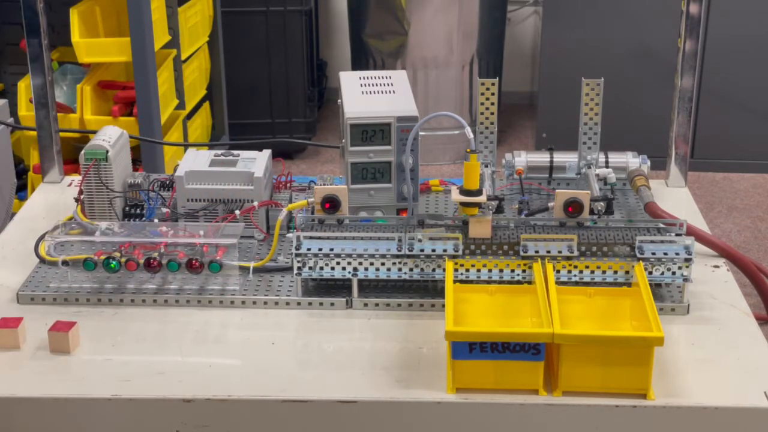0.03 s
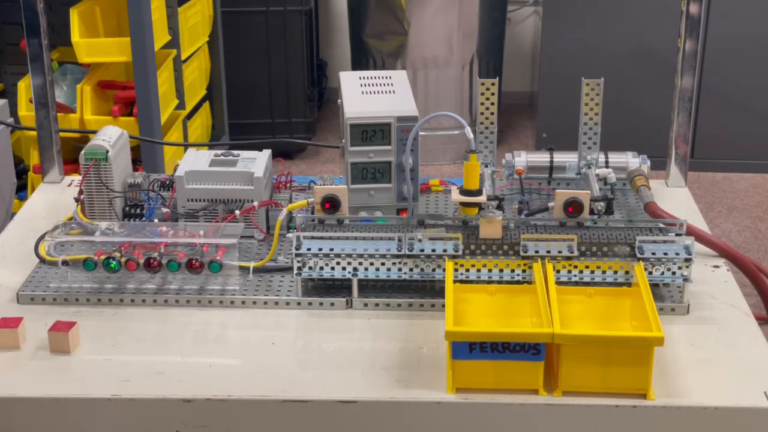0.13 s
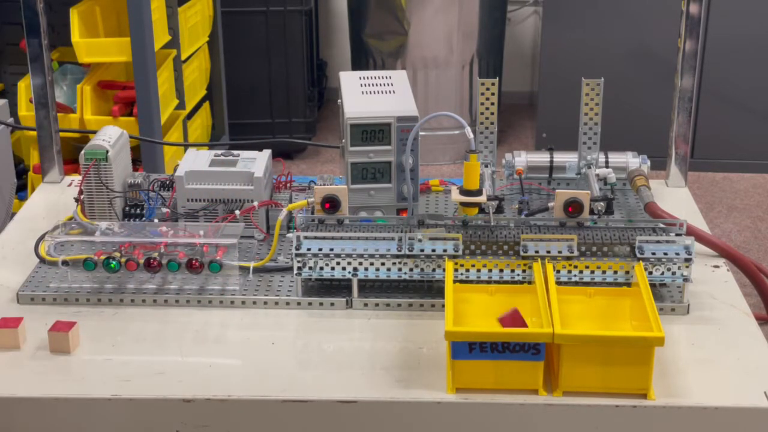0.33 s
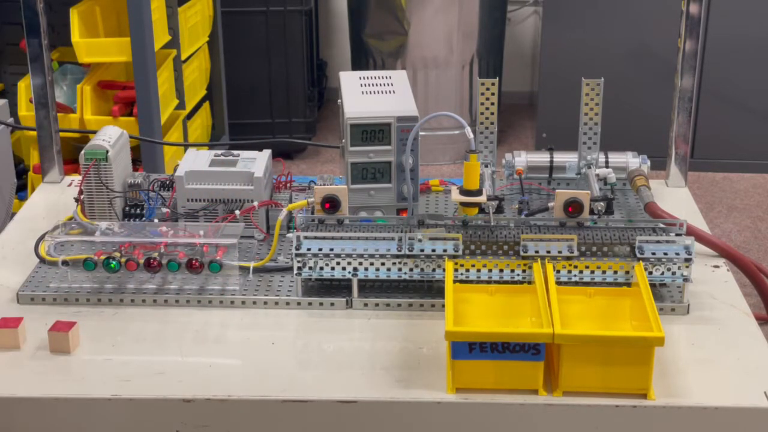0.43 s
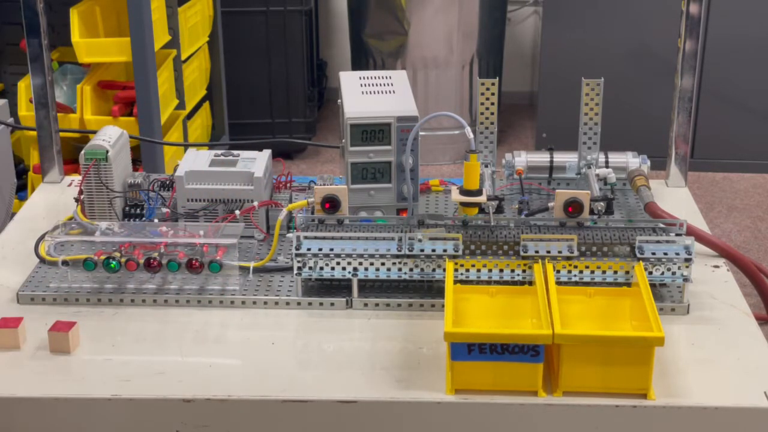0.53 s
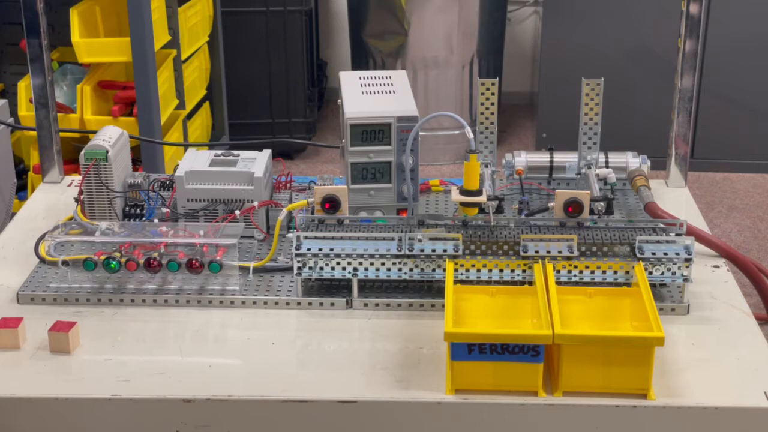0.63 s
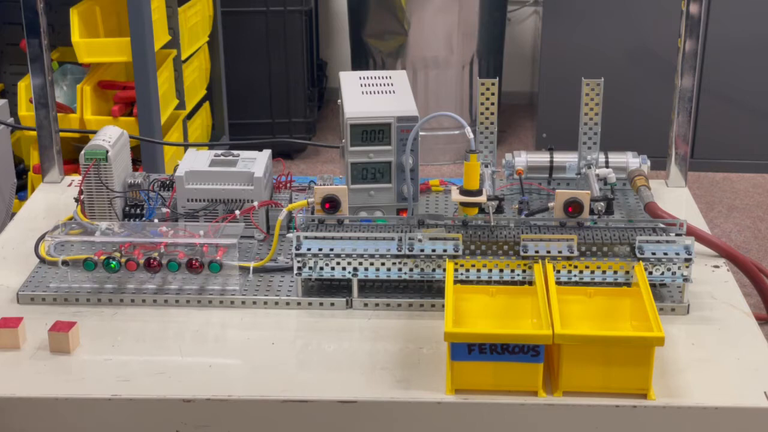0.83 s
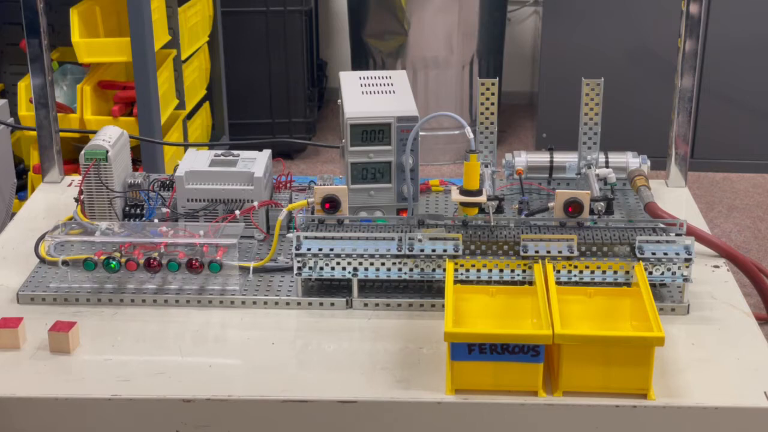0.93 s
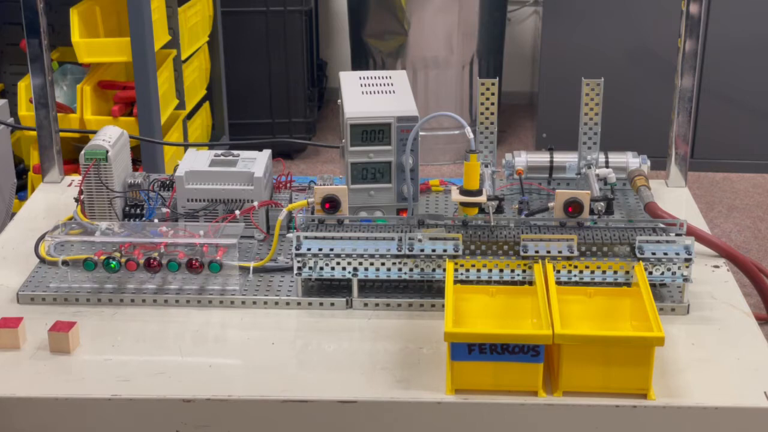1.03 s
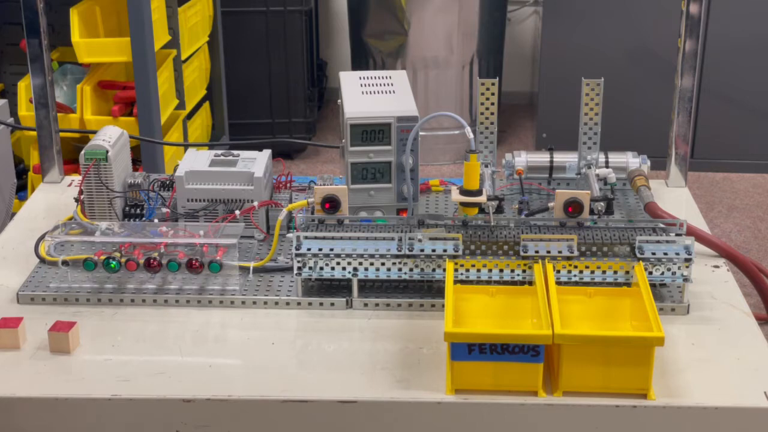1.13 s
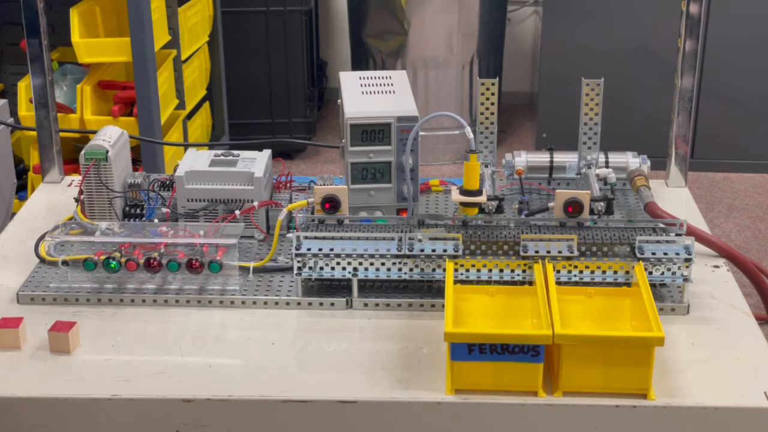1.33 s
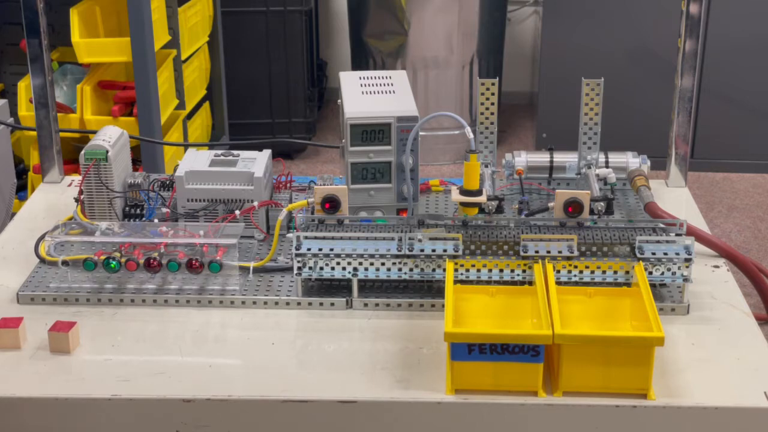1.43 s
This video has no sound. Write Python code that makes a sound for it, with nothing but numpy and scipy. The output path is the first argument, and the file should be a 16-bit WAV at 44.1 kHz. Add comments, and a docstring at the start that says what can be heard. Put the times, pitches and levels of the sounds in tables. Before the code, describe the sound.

A small pneumatic machine pops, hisses and clacks as a block clatters into a plastic bin.

```python
"""A small pneumatic sorter on a table in a hard-walled room, straight ahead of a stereo microphone.
Air hisses until a valve pops; the actuator knocks and the released block clatters into a plastic bin.
A second after the first pop the actuator moves back: a clack, another pop, a fading exhaust and a
knock at the end stop. Ventilation rumbles underneath throughout."""
import sys
import numpy as np
from scipy import signal
from scipy.fft import rfft, irfft
from scipy.io import wavfile

SR = 44100
rng = np.random.default_rng(int(sys.argv[2]) if len(sys.argv) > 2 else 0)


def file_out(sig):
    """Save sig as 16-bit WAV at sys.argv[1]."""
    # one column per channel
    cols = np.atleast_2d(sig).T
    # limit, then scale
    lim = np.clip(cols, -1, 1)
    pcm = np.round(lim * 32767).astype(np.int16)
    wavfile.write(sys.argv[1], SR, pcm)


N = 66150

# landings of the block: start_s, knock_db, edge_db, wall_db, boom_db, hollow_db, contact_cutoff_hz
BLOWS = [(.3618, -5.5, -15, -27, -60, -64, 10960), (0.3749, -22.5, -17.5, -26, -32, -23, 6000),
         (.3795, -30.5, -42, -18.5, -23, -36, 3000), (0.4576, -22.5, -37.5, -23, -31, -43, 4000),
         (0.4673, -17.5, -21, -23, -38, -40, 8000), (0.4949, -21.5, -32.5, -21, -41.5, -18.5, 3500),
         (.547, -25, -29, -59, -73, -55, 9000), (.5512, -23.5, -16, -29, -48.5, -42, 12000),
         (0.615, -52.5, -75, -34, -36.5, -52, 2000), (.756, -35.5, -81, -37.5, -49, -39.5, 1700)]


def block():
    """The block tumbles into the bin: its body knocks and its corners click."""
    # modes of the block knocking on the bin: pitch_hz, level_db, t60_s
    knock_modes = [(1106, -6, 0.014), (1245, -3.5, 0.025), (2626, -3.5, 0.0098), (3497, -1.5, 0.01),
                   (4327, -11, 0.017), (5080, -17.5, 0.008), (6404, -13.5, 0.0079)]
    # spectrum of a corner's click: frequency_hz, gain_db
    edge_spectrum = [(500, -7.5), (2000, 3), (3500, 3.5), (6500, -2), (8000, -7), (10000, -12.5),
                     (12200, -9.5), (15000, -19.5)]
    edges = sum(burst(start, db, t60=0.018) for start, _, db, *_ in BLOWS)
    knocks = sum(soften(ring(start, db, knock_modes), cutoff) for start, db, *_, cutoff in BLOWS)
    return knocks + colour(edges, edge_spectrum)


def plastic_bin():
    """Each landing shakes the walls of the bin; flat ones also make it boom and knock hollowly."""
    # low modes of the bin: pitch_hz, level_db, t60_s
    boom_modes = [(232.9, -10.5, .4), (274.2, -6, 0.34), (353.6, -1, 0.44), (465, -3, 0.19),
                  (512, -5.5, 0.2), (554.4, -3.5, 0.25), (622, -10.5, .3), (910, -15, 0.13),
                  (1003, -27.5, 0.067), (1105, -6.5, .18), (1253, -15.5, .16), (1650, -9.5, .2)]
    # hollow modes of its floor: pitch_hz, level_db, t60_s
    floor_modes = [(610.6, -1, 0.067), (708, -13.5, 0.066), (895, -1.5, 0.027), (1566, -3, 0.04)]
    # spectrum of the dense modes of its walls: frequency_hz, gain_db
    wall_spectrum = [(120, -17), (300, 0.5), (550, 0), (800, 3), (1100, -1), (1600, -3.5), (2100, -3),
                     (3000, -10), (4500, -17), (7500, -30), (15000, -43.5)]
    body = sum(ring(start, boom_db, boom_modes) + ring(start, hollow_db, floor_modes)
               for start, *_, boom_db, hollow_db, _ in BLOWS)
    walls = sum(soften(burst(start, db, t60=0.064), cutoff) for start, _, _, db, *_, cutoff in BLOWS)
    return body + colour(walls, wall_spectrum)


def valve():
    """Each pop is a pressure thump, a crack, a ping and a spit of air; an open line leaks and hisses."""
    # valve pops: start_s, thump_db, thump_pitch_hz, crack_db, crack_t60_s, spit_db
    pops = [(0.2001, -16, 500, -21, 0.025, -46.5), (1.2055, -10, 383, -16, .016, -31.5)]
    # air leaking through the valve: time_s, level_db
    leak_levels = [(0, -44), (.195, -44), (.225, -44.5), (.35, -54.5), (.42, -86), (1.195, -90),
                   (1.215, -46.5), (1.27, -46), (1.36, -55.5), (1.42, -65.5)]
    # spectrum of escaping air: frequency_hz, gain_db
    air_spectrum = [(150, -30.5), (400, -8.5), (1300, -3.5), (2500, -6.5), (5000, -8.5), (7500, -8),
                    (10000, -4), (12500, -12), (15000, -19)]
    # spectrum of the crack: frequency_hz, gain_db
    crack_spectrum = [(150, -12), (500, 8), (1400, 3.5), (1850, 2.5), (3000, 1.5), (4400, -6), (5200, -2.5),
                      (6300, -22.5), (7400, 4.5), (10000, -1.5), (12500, -5), (15000, -13)]
    # modes of the metal valve body: pitch_hz, level_re_crack_db, t60_s
    ping_modes = [(1520, -9, 0.04), (3280, -10.5, 0.017), (5300, -8, 0.013), (7435, -4.5, 0.013),
                  (11600, -7, 0.012), (12640, -8.5, .012)]
    t = np.arange(N) / SR
    thump = sum(-undb(db) * fade(start, t60=0.011) * np.sin(2 * np.pi * hz * (t - start))
                for start, db, hz, *_ in pops)
    thump = signal.sosfilt(signal.butter(2, 188, "high", fs=SR, output="sos"), thump)
    crack = sum(burst(start, db, t60) for start, _, _, db, t60, _ in pops)
    spit = sum(burst(start, db, t60=0.23) for start, *_, db in pops)
    leak_db = np.interp(t, *np.array(leak_levels).T)
    leak = undb(leak_db) * rng.standard_normal(N)
    ping = sum(ring(start, db, ping_modes) for start, _, _, db, _, _ in pops)
    return thump + ping + colour(crack, crack_spectrum) + colour(spit + leak, air_spectrum)


def actuator():
    """The piston knocks at the ends of its stroke and shakes the metal frame."""
    # knocks of the piston: start_s, frame_db, rattle_db, rattle_t60_s, tick_db
    stops = [(.313, -37, -41.5, 0.26, -31.5), (0.375, -61, -44, .1, -26.5), (1.173, -42, -28, 0.14, -64.5),
             (1.3745, -32, -35.5, 0.14, -43.5)]
    # modes of the frame: pitch_hz, level_db, t60_s
    frame_modes = [(349, -6.5, 0.36), (561, -8.5, 0.087), (924, -0.5, 0.037), (996, -1, 0.092),
                   (1220, -2, 0.071), (2148, -7, 0.045), (2470, -10, 0.051), (2600, -17, 0.049),
                   (3079, -15, 0.03), (4600, -8, 0.048)]
    # spectrum of the rattle: frequency_hz, gain_db
    rattle_spectrum = [(150, -33.5), (500, 6.5), (1200, 5.5), (2000, -3.5), (3000, -1), (5000, -11.5),
                       (7500, -15.5), (12000, -24), (15000, -29.5)]
    # spectrum of the treble tick: frequency_hz, gain_db
    tick_spectrum = [(1000, -16), (4000, -34), (7000, 3), (10000, 4), (12000, 6.5), (15000, -10)]
    frame = sum(ring(start, db, frame_modes) for start, db, *_ in stops)
    rattle = sum(burst(start, db, t60, attack_s=0.0016) for start, _, db, t60, _ in stops)
    tick = sum(burst(start, db, t60=0.06) for start, *_, db in stops)
    return frame + colour(rattle, rattle_spectrum) + colour(tick, tick_spectrum)


def room(x):
    """Early reflections from nearby surfaces, then a diffuse tail whose treble dies first."""
    # reverberation time: frequency_hz, t60_s
    decay_times = [(150, 1.16), (500, 0.79), (1200, 0.66), (3000, 0.58), (6000, 0.33), (12000, 0.2)]
    # spectrum of the reverberation: frequency_hz, gain_db
    echo_spectrum = [(100, -12.5), (300, 0), (1000, -4.5), (3000, -4), (6000, -9), (12000, -9)]
    build_s, early_db = 0.0098, -6.5
    t = np.arange(N) / SR
    build_up = 1 - np.exp(-(t / build_s) ** 2)
    noise_spectrum = rfft(stereo_noise(), 2 * N)
    centres = [hz for hz, _ in decay_times]
    tail = 0
    for share, (_, t60) in zip(np.eye(len(centres)), decay_times):
        band_gain = curve(list(zip(centres, share)), freqs())  # overlapping triangular bands
        band = irfft(noise_spectrum * band_gain)[:, :N]
        envelope = fade(0, t60) * build_up
        tail = tail + band * envelope / np.linalg.norm(envelope)
    early = fade(start=0.013, t60=0.1)
    response = tail + undb(early_db) * stereo_noise() * early / np.linalg.norm(early)
    response = colour(response, echo_spectrum, keep_level=False)
    return signal.fftconvolve(x[None], response, axes=1)[:, :N]


def ventilation():
    """Room tone: a steady low rumble, nearly the same in both channels."""
    # spectrum of the rumble: frequency_hz, gain_db
    rumble_spectrum = [(20, -34.5), (30, -22.5), (40, -10), (50, 5.5), (65, -3.5), (95, -3), (130, -4),
                       (160, -2.5), (195, -11.5), (260, -10.5), (360, -16.5), (480, -22), (800, -30.5),
                       (1200, -39), (3000, -42), (8000, -59), (12000, -58.5), (15000, -67.5)]
    return undb(-39.5) * colour(stereo_noise(), rumble_spectrum)


def stereo_noise():
    """Diffuse noise in two channels, alike in the bass."""
    # width of diffuse sound at the microphone: frequency_hz, side_over_mid_db
    width = [(30, -23.5), (70, -21), (140, -14), (280, -13.5), (550, -4.5), (1200, -2.5), (2500, -31.5),
             (12000, -5)]
    mid, side = rng.standard_normal((2, N))
    side = colour(side, width, keep_level=False)
    return np.array([mid + side, mid - side])


def ring(start, db, modes):
    """Struck modes of alternating polarity; each blow lands a little differently."""
    scatter_db = 0.58
    age = np.arange(N) / SR - start
    strengths = undb(db + scatter_db * rng.standard_normal(len(modes)))
    return sum((-1) ** k * strengths[k] * undb(mode_db) * fade(start, t60) * np.sin(2 * np.pi * hz * age)
               for k, (hz, mode_db, t60) in enumerate(modes))


def burst(start, db, t60, attack_s=1e-5):
    """A dying puff of noise."""
    age = np.maximum(np.arange(N) / SR - start, 0)
    rise = 1 - np.exp(-age / attack_s)
    return undb(db) * fade(start, t60) * rise * rng.standard_normal(N)


def fade(start, t60):
    """A sudden start, then a fall of 60 dB every t60 seconds."""
    age = np.arange(N) / SR - start
    return (age >= 0) * 1000. ** (-np.clip(age / t60, 0, 10))


def soften(x, cutoff_hz):
    """A softer contact pushes for longer and leaves out the treble."""
    return signal.sosfilt(signal.butter(2, cutoff_hz, fs=SR, output="sos"), x)


def colour(x, spectrum, keep_level=True):
    """Minimum-phase filter of the given shape; with keep_level, white noise keeps its level."""
    gain = undb(curve(spectrum, freqs()))
    if keep_level:
        gain = gain / np.sqrt(np.mean(gain ** 2))
    cepstrum = irfft(np.log(gain))
    lag = np.arange(2 * N)
    causal_fold = 1 + np.sign(N - lag) - (lag == 0)
    response = np.exp(rfft(cepstrum * causal_fold))
    return irfft(rfft(x, 2 * N) * response)[..., :N]


def curve(points, hz):
    """Read a table on a log-frequency axis."""
    table_hz, values = np.array(points, float).T
    return np.interp(np.log(hz + 1), np.log(table_hz), values)


def freqs():
    """Frequency axis of a double-length transform."""
    return np.arange(N + 1) * SR / (2 * N)


def undb(db):
    """Decibels to gain."""
    return 10 ** (np.asarray(db) / 20)


def scene():
    """Machine and block straight ahead of the microphone, the room all around."""
    # how much of the block's clicking reaches the room: frequency_hz, gain_db
    click_send = [(1000, -2), (2700, -4), (4500, -5.5), (7000, -4), (12000, -3)]
    air, piston, clicks, thuds = valve(), actuator(), block(), plastic_bin()
    room_clicks = colour(clicks, click_send, keep_level=False)
    into_room = undb(-4.5) * air + undb(-1) * piston + room_clicks + undb(0.5) * thuds
    return air + piston + clicks + thuds + room(into_room) + ventilation()


def record(dry):
    """The microphone's two ports differ in phase; it notches the treble and cuts the top."""
    # phase of the left port ahead of the right: frequency_hz, lead_rad
    port_phase = [(100, 0), (700, -.15), (2000, .15), (3200, .55), (5080, .7), (5770, -1.5), (6700, -.7),
                  (7600, -2.2), (9900, -3.9), (11500, -5.1), (13200, -6.2), (16000, -6.4)]
    # treble response of the microphone: frequency_hz, gain_db
    mic_response = [(9500, 0), (12000, -1), (13300, 2), (14300, -5), (15700, -11)]
    notch_hz, notch_width_hz, notch_db, top_hz = 9000, 294, -16, 15700
    hz = freqs()
    notch = undb(notch_db * np.exp(-((hz - notch_hz) / notch_width_hz) ** 2))
    treble = undb(curve(mic_response, hz))
    phase_shift = np.exp(0.5j * curve(port_phase, hz) * np.array([[1], [-1]]))
    heard = irfft(rfft(dry, 2 * N) * notch * treble * phase_shift)[:, :N]
    return signal.sosfilt(signal.ellip(8, 0.2, 80, top_hz, fs=SR, output="sos"), heard)


dry = scene()
out = record(dry)
file_out(out)
```